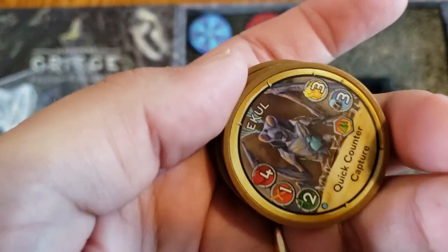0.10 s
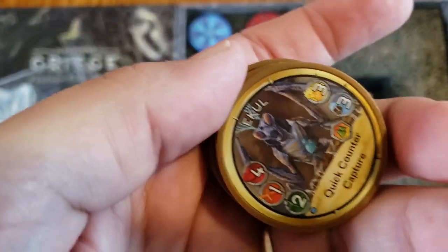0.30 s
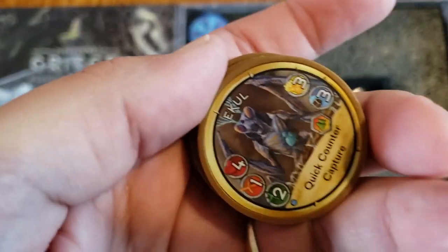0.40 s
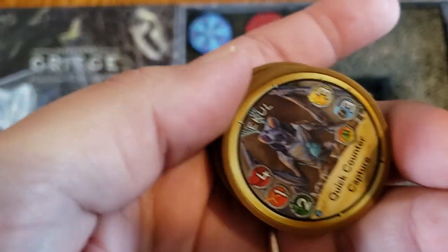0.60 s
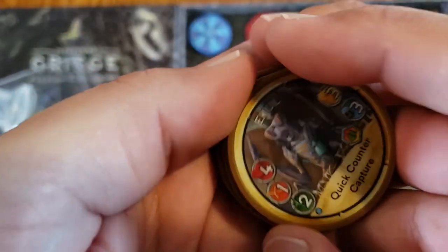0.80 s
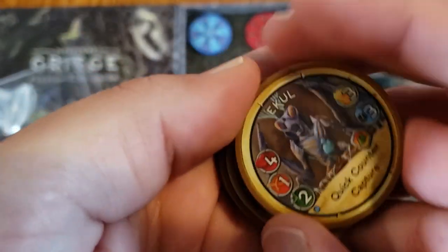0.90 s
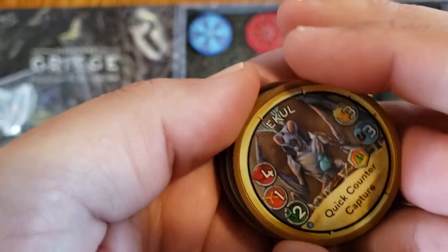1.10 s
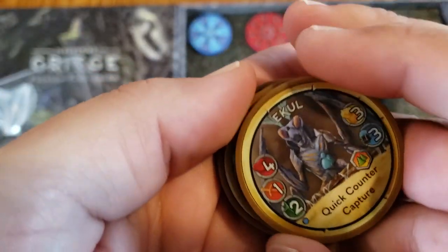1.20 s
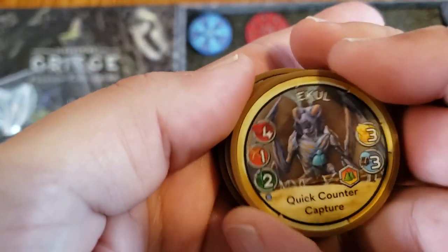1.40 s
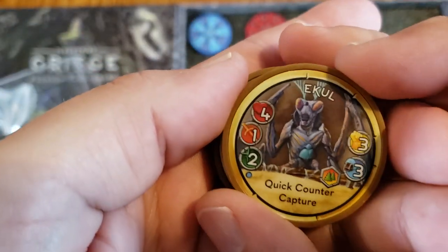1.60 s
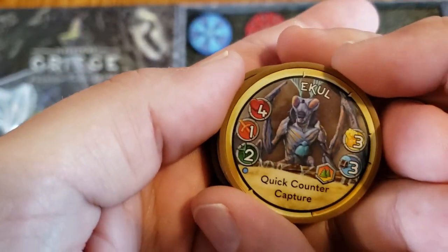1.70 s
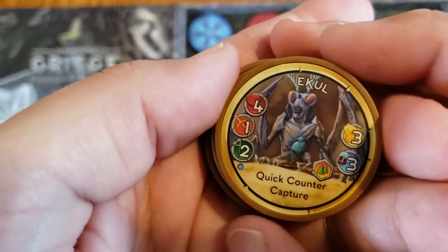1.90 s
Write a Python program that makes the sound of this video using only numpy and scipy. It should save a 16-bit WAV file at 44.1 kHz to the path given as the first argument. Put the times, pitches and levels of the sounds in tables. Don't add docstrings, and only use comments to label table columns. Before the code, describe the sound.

After a brief quiet, a pile of hard plastic chips lands with dense clacks and dull table thumps, settles with soft taps, then fingers scrape a chip faintly and snap it once; small room, light hiss.

```python
import sys
import numpy as np
from scipy import signal
from scipy.fft import rfft, irfft, next_fast_len
from scipy.io import wavfile
from scipy.ndimage import uniform_filter1d, map_coordinates

SR = 44100
rng = np.random.default_rng(int(sys.argv[2]) if len(sys.argv) > 2 else 0)


def field_ratio(decibels):
    return 10 ** (np.asarray(decibels, dtype=float) / 20)


def generate_wav(sig):
    pcm = np.round(np.clip(np.atleast_2d(sig).T, -1, 1) * 32767).astype(np.int16)
    wavfile.write(sys.argv[1], SR, pcm)


N = 83790
CLACK_RISE_S = 0.0003


def unit(x):
    return x / np.sqrt(np.mean(x ** 2) + 1e-30)


def along(points, hz):
    f, v = np.transpose(points)
    return np.interp(np.log(hz + 1), np.log(f + 1), v)


def curves(rows):
    s, *columns = np.transpose(rows)
    return [np.interp(np.arange(N) / SR, s, c) for c in columns]


def filtered(x, response):
    m = next_fast_len(N + SR // 2)
    return irfft(rfft(x, m) * response(np.fft.rfftfreq(m, 1 / SR)), m)[..., :N]


def coloured(x, spectrum):
    return unit(filtered(x, lambda hz: field_ratio(along(spectrum, hz))))


def causal(x, spectrum):
    size = 2048
    level_db = np.maximum(along(spectrum, np.fft.rfftfreq(size, 1 / SR)), -70)
    cepstrum = irfft(np.log(field_ratio(level_db)))
    cepstrum[1:size // 2] *= 2
    cepstrum[size // 2 + 1:] = 0
    pulse = irfft(np.exp(rfft(cepstrum)))
    return signal.fftconvolve(x, pulse[None] / np.linalg.norm(pulse), axes=1)[:, :N]


def pair(alike, shape=1):
    turn = lambda hz: np.arccos(np.clip(along(alike, hz), -1, 1)) / 2
    split = lambda hz: np.array([np.cos(turn(hz)), np.sin(turn(hz))])
    mid, side = filtered(shape * rng.standard_normal((2, N)), split)
    return np.array([mid + side, mid - side])


def grains(rate, spread_db):
    touches = (rng.random(N) < rate / SR) * rng.choice([-1, 1], N)
    return unit(touches * field_ratio(spread_db * rng.standard_normal(N)))


def swell(s, rise, hold, fade):
    t = np.arange(N) / SR - s
    return np.clip(t / rise, 0, 1) * field_ratio(-60 * np.clip(t - hold, 0, 9) / fade)


def wander(rate):
    return map_coordinates(rng.standard_normal(int(N * rate / SR) + 4), [np.arange(N) / SR * rate])


def resonate(x, modes):
    def response(f):
        total = 0
        for k, (c, w, db) in enumerate(modes):
            total = total + (-1) ** k * field_ratio(db) * 1j * f * w / (c * c - f * f + 1j * f * w)
        return total
    return filtered(x, response)


# (frequency [Hz], likeness [0-1])
ROOM_ALIKE = [(30, .75), (70, 0.8), (200, 1), (400, 0.38), (800, 0.067), (8000, 0.059)]
# (frequency [Hz], time to fall 60 dB [s])
ROOM_FADE = [(100, 0.27), (300, 0.43), (1200, 0.31), (3000, 0.3), (7000, 0.31), (13000, 0.3)]


def room(x):
    hz, t, z = signal.stft(pair(ROOM_ALIKE)[:, :SR * 3 // 4], SR, nperseg=256)
    tail = signal.istft(z * field_ratio(-60 * t / along(ROOM_FADE, hz)[:, None]), SR, nperseg=256)[1]
    late = np.pad(x.mean(0), (150, 0))[None]
    return signal.fftconvolve(late, tail / np.linalg.norm(tail[0]), axes=1)[:, :N]


# (time [s], peak level [dB], thump over crack [dB], length [s], rim ring [dB])
CLACKS = [(0.2125, -33, 1.5, .0035, 6.5), (0.2201, -33, -5, .003, 2.5), (0.2269, -38, 3.5, .003, 2),
          (0.231, -42, 9.5, .006, -7), (0.2364, -37, 2, .004, 5), (0.2417, -41, 7, .005, 0),
          (0.26, -19.5, -3.5, 0.0026, 8), (0.2629, -26.5, 0, 0.0023, -2), (.2650, -22.5, -7.5, .0035, 5.5),
          (0.2673, -19.5, -8, 0.0011, -2.5), (0.269, -28.5, -3.5, .004, 0.5),
          (0.278, -32.5, -6, .004, -5.5), (.2829, -29.5, -7, .004, 2.5), (0.287, -28.5, -4, .003, 0.5),
          (0.2973, -29.5, -7, .008, -2.5), (.3120, -32.5, -4, .004, -1.5), (0.318, -34.5, 3.5, .003, 1),
          (0.325, -36.5, 1, .006, -3), (0.345, -36, 2.5, .006, -7.5), (.362, -36.5, -1, .004, -11.5),
          (0.3851, -33, 0, .0068, -3), (.4140, -35, -6.5, .003, 2), (0.4177, -27, -6, .006, -9.5),
          (0.43, -39, 0, .005, 14), (0.438, -34, -2.5, .004, -9), (.444, -37.5, 5.5, .0054, -21),
          (0.465, -41, 3, .004, 2), (0.476, -40.5, -3.5, .006, -3.5)]
FIRST_S = CLACKS[0][0]


def clacks(thump=0, rim=0, rise=CLACK_RISE_S, fade=3):
    return sum(field_ratio(db + thump * low + rim * ring) * swell(s, rise, length, fade * length)
               for s, db, low, length, ring in CLACKS)


def hard_contacts():
    hits = np.zeros((1, N))
    for s, db, *_ in CLACKS:
        hits[0, round(s * SR)] = field_ratio(db + 12)
    return hits


# (frequency [Hz], likeness [0-1])
CLATTER_ALIKE = [(100, 0.97), (350, 0.96), (700, 0.59), (1500, 0.8843), (8000, .35)]


def clatter(loudness):
    return pair(CLATTER_ALIKE, loudness) * (np.arange(N) / SR > FIRST_S)


# (time [s], crack level [dB], thump level [dB])
RATTLE = [
    (.2125, -60, -57),
    (.214, -45, -34),
    (.255, -51.5, -38),
    (.27, -39.5, -39.5),
    (.33, -37, -37.5),
    (.41, -48, -36.5),
    (.43, -35.5, -40.5),
    (.5, -52, -39.5),
    (.57, -77, -63.5),
]


def rattle(column):
    t = np.arange(N) / SR
    on = (t > FIRST_S) & (t < RATTLE[-1][0])
    contacts = grains(1100, 5)
    ragged = np.sqrt(np.abs(uniform_filter1d(contacts ** 2, size=41)))
    return field_ratio(curves(RATTLE)[column]) * on * ragged


# (frequency [Hz], level [dB per Hz])
CRACK = [(1500, -40), (2500, -2), (3900, -9.5), (5600, -6.5), (7000, -5), (10000, -8.5), (12500, -16),
         (15500, -22.5)]


def cracks(hits):
    return causal(clatter(rattle(0) + clacks()) + hits, CRACK)


# (frequency [Hz], level [dB per Hz])
THUMP = [(40, -30), (70, -16), (135, -7), (200, -4.5), (310, -3), (680, -3.5), (1000, -7.5), (2000, -7),
         (4500, -32)]
# (frequency [Hz], level [dB], time to fall 60 dB [s])
TABLE = [(240, -15.5, 0.22), (244, -11, 0.89), (309, -8.5, 1), (444, -12, .3), (690, -17.5, 0.18),
         (730, -15.5, 0.24), (855, -22, 0.65), (1940, -18.5, 0.2)]


def thumps_and_table():
    push = clatter(rattle(1) + clacks(thump=1, rise=0.0005, fade=4))
    rings = [(hz, np.log(1000) / np.pi / t60, db + 10 * np.log10(t60 * 1000)) for hz, db, t60 in TABLE]
    return causal(push, THUMP) + field_ratio(-10.5) * resonate(push.mean(0), rings)


# (frequency [Hz], width [Hz], level [dB])
RIM = [(6770, 510, 2), (7190, 520, -0.5)]


def rims(hits):
    rim_gain = field_ratio(9.5)
    return resonate(clatter(rim_gain * clacks(rim=1)) + rim_gain * hits, RIM)


# (time [s], level [dB])
ROCKING = [
    (.587, -56.5),
    (.648, -57.5),
    (.710, -59),
    (.778, -66),
    (0.799, -69.5),
    (.832, -67.5),
]
# (frequency [Hz], width [Hz], level [dB])
ROCK_MODES = [(369, 108, 2), (1124, 157, -1), (1185, 138, 0), (1380, 93, -7), (1717, 180, -10),
              (2290, 240, -12)]


def rocking():
    taps = sum(field_ratio(db) * swell(s, 0.0031, 0.014, 0.084) for s, db in ROCKING)
    return resonate(resonate(10 * taps * rng.standard_normal(N), ROCK_MODES), ROCK_MODES)


# (frequency [Hz], left over right [dB])
PILE_PAN = [(100, 1), (700, -0.1), (2400, 3.5), (5000, 1.65), (9000, -2), (13000, 1)]


def tumble():
    hits = hard_contacts()
    dry = cracks(hits) + thumps_and_table() + rims(hits)
    place = lambda hz: field_ratio(np.outer([0.5, -0.5], along(PILE_PAN, hz)))
    placed = filtered(dry + field_ratio(-4) * room(dry), place)
    return placed * (np.arange(N) / SR > FIRST_S - CLACK_RISE_S) + rocking()


# (time [s], frequency [Hz], level
# [dB], time to fall 60 dB [s])
BLOWS = [(0.21, 133.5, -32.5, 0.41), (0.25, 137, -36.5, .2), (.214, 702, -29.5, 0.1),
         (.259, 690, -33, 0.19), (0.27, 1256, -27, 0.078), (.38, 308, -35, 0.51), (0.429, 350.5, -34, 0.41),
         (.214, 350, -33, 0.18), (.214, 345, -36, .15), (.5, 306, -46, 0.62), (.6, 308, -50, .5),
         (.214, 262, -32, .15), (.214, 165, -36, .15), (.59, 1180, -55, .12), (.65, 1210, -58, 0.13),
         (.712, 1200, -60, 0.12), (.71, 390, -56, 0.19), (.79, 320, -61, 0.26), (.835, 345, -62, 0.19),
         (.38, 262, -39.5, 0.53), (0.48, 2010, -41, 0.14)]


def blows():
    t = np.arange(N) / SR
    total = 0
    for s, hz, db, t60 in BLOWS:
        strength = field_ratio(db + 2 * wander(18)) * swell(s, 0.0032, 0, t60)
        total = total + strength * np.sin(2 * np.pi * hz * (t - s) + 0.87 * wander(18))
    return total


# (time [s], length [s], level [dB], body mode [dB], middle modes [dB])
SCRAPES = [
    (0.91, 0.027, -72, 5, 15),
    (0.928, 0.026, -66, -9, -5),
    (0.978, 0.015, -71, -8, -23),
    (0.996, .024, -70, -10, -16),
    (1.045, 0.025, -78.5, -10, -7),
    (1.196, 0.027, -68, 2.5, -7),
    (1.41, 0.049, -71.5, -3, -11.5),
    (1.47, 0.068, -70.5, -2, -10),
]
# (frequency [Hz], width [Hz], level [dB])
CHIP = [(876, 333, -7), (1710, 150, -10), (2164, 400, -6), (4560, 990, -2), (4930, 364, -3.5),
        (7200, 730, -11), (9640, 490, -10)]


def scrapes():
    rub = 10 * grains(7400, 3)
    shapes = np.array([field_ratio(db) * swell(s, 0.35 * length, 0.62 * length, 3.15 * length)
                       for s, length, db, *_ in SCRAPES])
    body, middle = field_ratio(np.array(SCRAPES)[:, 3:].T) @ shapes
    firm = field_ratio(2.5 * (np.array(SCRAPES)[:, 2] + 65)) @ shapes
    ring = lambda x, modes: 1.63 * resonate(resonate(x, modes), modes)
    chip = ring(rub * body, CHIP[:1]) + ring(rub * middle, CHIP[1:3])
    return chip + ring(rub * firm, CHIP[3:4]) + ring(rub * shapes.sum(0), CHIP[4:])


# (time [s], level [dB], fade [s])
BRUSHES = [
    (.782, -76, 0.12),
    (1.48, -79, 0.076),
    (1.694, -65.5, 0.065),
]
# (frequency [Hz], level [dB per Hz])
SKIN = [(5000, -120), (8000, -28), (11500, 0), (13500, -5), (15000, -8), (16000, -120)]


def brushes():
    strokes = sum(field_ratio(db) * swell(s, 0.006, 0.013, 3 * fade) for s, db, fade in BRUSHES)
    return coloured(pair([(1000, 0.37)]), SKIN) * strokes


# (time [s], level [dB])
TICKS = [
    (1.7005, -66),
    (1.8673, -54.5),
    (1.8710, -33),
    (1.8728, -47.5),
    (1.8743, -47),
]
# (frequency [Hz], width [Hz], level [dB])
SNAP = [(860, 550, -10), (1703, 910, -5.5), (2240, 385, 0), (4996, 107, 1), (6870, 185, -6.5),
        (10070, 670, -18.5)]


def click():
    ticks = np.zeros(N)
    for s, db in TICKS:
        ticks[round(s * SR)] = field_ratio(db + 26.5)
    low_hz, top_hz = 550, 7240
    soften = lambda hz: (1j * hz / (low_hz + 1j * hz) / (1 + 1j * hz / top_hz)) ** 2
    damp_s, damp_fade_s = 1.8765, 0.012
    return resonate(filtered(ticks, soften), SNAP) * swell(0, CLACK_RISE_S, damp_s, damp_fade_s)


# (time [s], level [dB], frequency [Hz], width [Hz])
NAILS = [
    (1.097, -56.5, 7210, 1111),
    (1.7055, -65, 11900, 4000),
]


def nails():
    return sum(resonate(field_ratio(db + 20) * (np.arange(N) == round(s * SR)), [(hz, width, 0)])
               for s, db, hz, width in NAILS)


def fingers():
    chip, skin, snap = scrapes(), brushes(), click() + nails()
    pan_db = 12.5
    pan = field_ratio([[pan_db / 2], [-pan_db / 2]])
    return pan * (chip + skin + snap) + room(pan * (field_ratio(-10) * (snap + skin) + field_ratio(-16) * chip))


# (time [s], level [dB])
HUM_LEVEL = [(0, -69.5), (.15, -70), (.45, -61), (.7, -73), (.85, -64.5), (.95, -76.5), (1.03, -64.5),
             (1.18, -75), (1.3, -59.5), (1.4, -66.5), (1.5, -72.5), (1.6, -66), (1.7, -68), (1.9, -73.5)]
# (frequency [Hz], level [dB per Hz])
HUM = [(15, -45.5), (25, -20.5), (76, -4.5), (128, -10.5), (150, -24.5), (260, -61), (400, -120)]
# (frequency [Hz], level [dB per Hz])
AIR = [(60, -120), (110, -12.5), (160, 0), (240, -6), (400, -10.5), (700, -18.5), (910, -50), (1540, -120)]
# (frequency [Hz], level [dB])
MOTOR = [(119.5, -78.5), (222, -78.5)]
# (frequency [Hz], level [dB per Hz])
HISS = [(300, -29.5), (500, -3), (800, -1), (2000, -6), (5700, -8.5), (9000, -3.5), (13500, -3),
        (16000, -7.5)]


def background():
    level_db, = curves(HUM_LEVEL)
    t = np.arange(N) / SR
    hum = coloured(pair(ROOM_ALIKE), HUM) * field_ratio(level_db + 3 + 1.5 * wander(6))
    air = coloured(pair(ROOM_ALIKE), AIR) * field_ratio(-77 + 2.6 * wander(4.3))
    motor = sum(field_ratio(db + 2.5 + 0.45 * wander(1.1)) * np.sin(2 * np.pi * hz * t + 0.41 * wander(18))
                for hz, db in MOTOR)
    hiss = field_ratio(-76) * coloured(rng.standard_normal((2, N)), HISS)
    return hum + air + motor + hiss


def scene():
    both = tumble() + blows() + fingers() + background()
    lag_s = 0.00013
    return filtered(both, lambda hz: np.exp(1j * np.pi * hz * lag_s * np.array([[1], [-1]])))


# (start [s], end [s], low edge [Hz], high edge [Hz])
TREBLE_BANDS = [(.222, .256, 8000, 14000), (.3, .35, 13000, 14200), (.365, .405, 13200, 17000),
                (.445, .55, 12700, 17000), (.55, .585, 13200, 17000), (.28, .4, 8300, 8900),
                (.44, .64, 8300, 8900), (.211, .217, 15000, 16000), (.2575, .263, 15000, 16600),
                (.414, .424, 15000, 15600), (.92, .99, 8100, 9000)]
TREBLE_BANDS_DB = [-8.5, -17, -26, -48, -28.5, -11.5, -23, 19, 32, 25, -15]


def treble_changes(x):
    hz, t, z = signal.stft(x, SR, nperseg=256)
    change_db = 0
    for (start, end, low, high), db in zip(TREBLE_BANDS, TREBLE_BANDS_DB):
        change_db = change_db + db * np.outer((hz > low) & (hz < high), (t > start) & (t < end))
    return signal.istft(z * field_ratio(change_db), SR, nperseg=256)[1][:, :N]


def top_cut(x):
    return signal.sosfilt(signal.butter(12, 16640, fs=SR, output="sos"), x)


def record(dry):
    peak = lambda f, c, w: 1j * f * w / (c * c - f * f + 1j * f * w)
    port = lambda f: 1 + field_ratio(3) * peak(f, 7175, 120)
    notch = lambda f: 1 - 0.75 * peak(f, 8604, 2500)
    edge = lambda f: 1 / (1 + (f / 14750) ** 160) + field_ratio(-55)
    heard = filtered(dry, lambda f: port(f) * notch(f) * edge(f))
    return top_cut(treble_changes(heard))


dry = scene()
out = record(dry)
generate_wav(out)
```